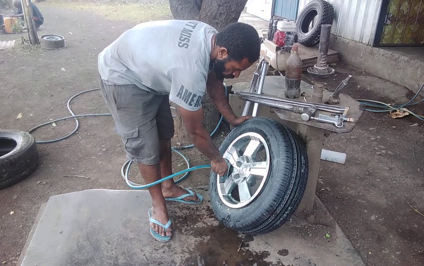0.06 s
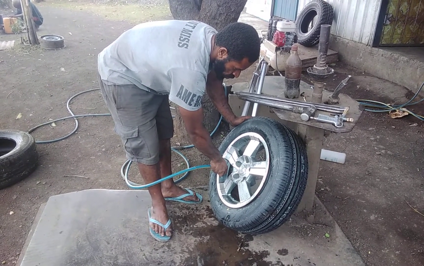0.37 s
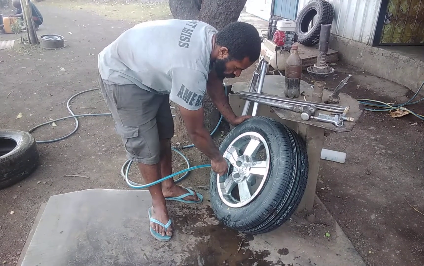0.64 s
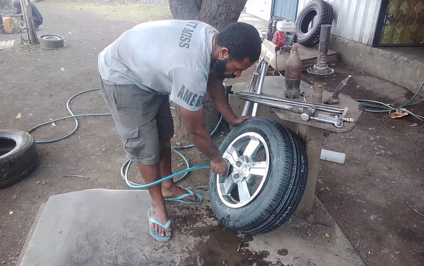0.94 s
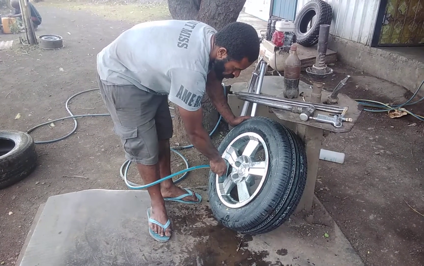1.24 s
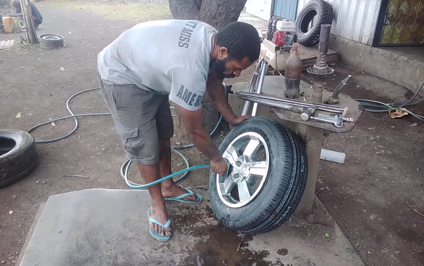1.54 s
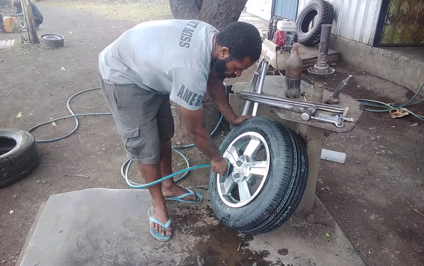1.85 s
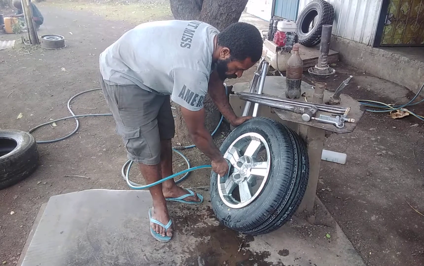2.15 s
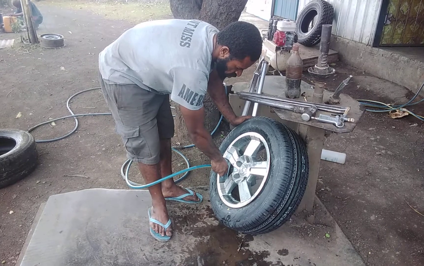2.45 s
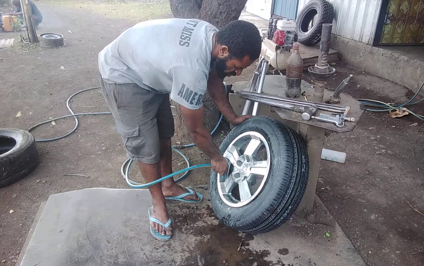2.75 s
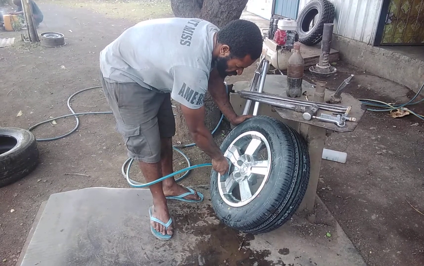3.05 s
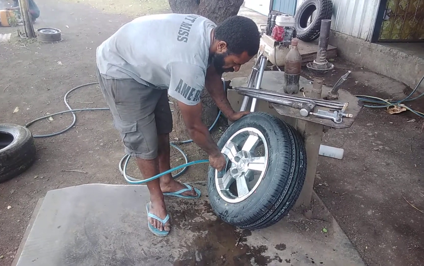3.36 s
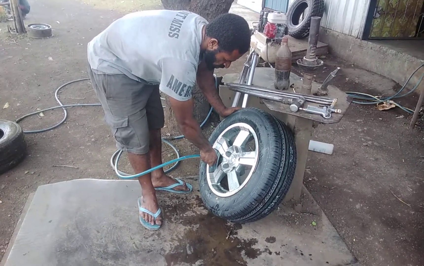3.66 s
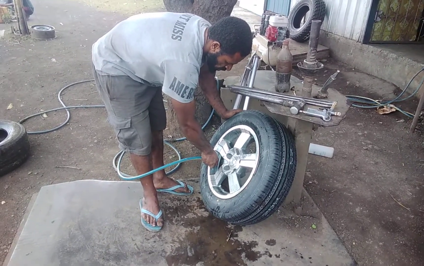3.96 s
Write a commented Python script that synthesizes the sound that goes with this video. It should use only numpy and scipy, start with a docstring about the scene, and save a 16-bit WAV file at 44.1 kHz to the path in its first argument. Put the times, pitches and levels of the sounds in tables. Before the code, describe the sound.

A car tyre being inflated pops onto its rim with one loud bang, after steady valve hiss over a chugging engine and knocking compressor. The close bang overloads the microphone, and the wheel rings briefly in the open yard.

```python
"""A small petrol engine chugs in an open yard, a piston compressor knocks at a slightly different rate,
and air hisses through the valve of a car tyre being inflated on its rim. About three seconds in, the
bead snaps onto the rim, close enough for the bang to overload the single microphone. The air cavity
and the rim ring on, and a few low buffets follow."""
import sys
import numpy as np
from scipy import signal
from scipy.fft import rfft, irfft, next_fast_len
from scipy.io import wavfile

SR = 44100
rng = np.random.default_rng(int(sys.argv[2]) if len(sys.argv) > 2 else 0)


def transcribe(signal):
    """Save signal, clipped to [-1, 1], as a 16-bit WAV file at the path in sys.argv[1]."""
    frames = np.atleast_2d(signal).T
    limited = np.clip(frames, -1, 1)
    pcm = np.round(limited * 32767).astype(np.int16)
    wavfile.write(sys.argv[1], SR, pcm)


N = 176400
TIME = np.arange(N) / SR


def from_db(db):
    """Decibels to gain."""
    return 10 ** (np.asarray(db) / 20)


def rms_one(x):
    """Scale to rms 1."""
    return x / np.sqrt(np.mean(x ** 2) + 1e-20)


def colour(x, points):
    """Causal (minimum-phase) filter with the given (Hz, dB) response."""
    size = next_fast_len(2 * N, real=True) // 2 * 2
    hz, db = np.transpose(points)
    log_hz = np.log(np.fft.rfftfreq(size, 1 / SR) + 1e-9)
    log_gain = np.log(from_db(np.interp(log_hz, np.log(hz), db)))
    cepstrum = irfft(log_gain)
    cepstrum[1:size // 2] *= 2
    cepstrum[size // 2 + 1:] = 0
    return irfft(rfft(x, size) * np.exp(rfft(cepstrum)))[:N]


def noise(points):
    """Coloured noise, rms 1."""
    return rms_one(colour(rng.standard_normal(N), points))


def drift(hz):
    """Random movement, mostly slower than hz, rms 1."""
    rolloff = 1 + (np.fft.rfftfreq(N, 1 / SR) / hz) ** 2
    return rms_one(irfft(rfft(rng.standard_normal(N)) / rolloff, N))


def ring(x, modes):
    """Damped modes driven by x, signs alternating."""
    out = 0
    for k, (hz, db, t60) in enumerate(modes):
        radius, angle = from_db(-60 / (t60 * SR)), 2 * np.pi * hz / SR
        feedback = [1, -2 * radius * np.cos(angle), radius ** 2]
        mode = signal.lfilter([0, np.sin(angle)], feedback, x + 1e-18)
        out = out + (-1) ** k * from_db(db) * mode
    return out


def dying(age, t60):
    """Full level until age 0, then a fall of 60 dB every t60 seconds."""
    return from_db(-60 * np.maximum(age, 0) / t60)


def strokes(hz, first_s, uneven_db, jitter_s):
    """One click per machine cycle, slightly uneven in time and strength."""
    due_s = np.arange(first_s, N / SR, 1 / hz)
    timing, strength = rng.standard_normal((len(due_s), 2)).T
    samples = ((due_s + jitter_s * timing) * SR).astype(int)
    clicks = np.zeros(N)
    clicks[np.clip(samples, 0, N - 1)] = from_db(uneven_db * strength)
    return clicks


ENGINE_HZ = 25.402
# The exhaust puff, heard through the silencer. Each row: frequency in Hz, relative level in dB.
EXHAUST_SPECTRUM = [(12, -22), (25, -12.5), (51, -3), (76, -8.5), (102, -8), (127, -0.5), (152, 0),
                    (178, -13.5), (203, -18), (250, -11.5), (285, -30.5), (345, -26.5), (430, -33),
                    (600, -26.5), (1000, -45), (3000, -65)]
# The intake gulp, heard through the air filter. Each row: frequency in Hz, relative level in dB.
INTAKE_SPECTRUM = [(20, -53), (76, 11), (110, -5), (200, -6.5), (250, 3), (285, -14.5), (345, 4), (400, -4),
                   (430, -22), (482, 2), (540, -22.5), (1500, -45)]


def engine(first_s=-.0046, intake_delay_s=.0275):
    """In each cycle an exhaust puff rings in the silencer and a weaker intake gulp follows."""
    puffs = strokes(ENGINE_HZ, first_s, uneven_db=.53, jitter_s=.0001)
    gulps = strokes(ENGINE_HZ, first_s + intake_delay_s, uneven_db=.53, jitter_s=.0001)
    exhaust = from_db(-26.5) * rms_one(colour(puffs - puffs.mean(), EXHAUST_SPECTRUM))
    intake = from_db(-41) * rms_one(colour(gulps, INTAKE_SPECTRUM))
    return intake - exhaust


# The compressor's body. Each row: frequency in Hz, relative level in dB, seconds to fall 60 dB.
BODY_MODES = [(578.5, -5.5, 0.064), (705, -7, 0.05), (795, -5, 0.081), (863.6, -1, 0.1), (963, -5, 0.032),
              (1281, -11.5, 0.11)]
# Its drone. Each row: multiple of the stroke rate, peak level in dB about which the tone wavers.
DRONE_TONES = [(8, -42), (11.5, -46), (13, -53), (21, -48), (25, -48.5)]
# Both machines clattering in the yard. Each row: frequency in Hz, relative noise density in dB.
CLATTER_SPECTRUM = [(20, -3), (130, 0.5), (220, -6), (330, 3), (390, -1.5), (440, -7.5), (535, -9.5),
                    (590, -4), (670, -0.5), (880, 1), (990, -1), (1060, -8), (1160, -8), (1280, 0.5),
                    (1400, -1.5), (1620, -6.5), (1800, -5), (2100, -6), (2400, -12), (2750, -8),
                    (3200, -15), (8000, -28.5)]


def compressor(stroke_hz=28.557, rattle_decay_s=.0037):
    """Each piston stroke knocks and briefly rattles the body, over a drone and a steady clatter."""
    knocks = strokes(stroke_hz, first_s=.0225, uneven_db=1.0, jitter_s=.00015)
    rattle_envelope = signal.lfilter([1], [1, -np.exp(-1 / (rattle_decay_s * SR))], knocks)
    rattle = rattle_envelope * rng.standard_normal(N)
    body = rms_one(ring(rms_one(knocks) + .29 * rms_one(rattle), BODY_MODES))
    drone = 0
    for multiple, db in DRONE_TONES:
        level = from_db(db + 3.5 * drift(hz=2.7))
        drone = drone + level * np.sin(2 * np.pi * (multiple * stroke_hz * TIME + rng.random()))
    clatter = from_db(-33 + .83 * drift(hz=12)) * noise(CLATTER_SPECTRUM)
    return from_db(-37.5) * body + drone + clatter


# Air rushing in at the tyre valve. Each row: frequency in Hz, relative noise density in dB.
HISS_SPECTRUM = [(1000, -16), (3000, -13.5), (3800, -9.5), (4300, -8.5), (4600, -3.5), (4850, -6),
                 (5300, -.5), (5800, -2.5), (6700, -0.5), (7400, -2), (7800, -2), (8300, -3), (10300, -6),
                 (11800, -4.5), (13200, -10), (14200, -8.5), (15700, -23.5)]


def valve_air(whistle_hz=15060, whistle_width_hz=130):
    """The jet in the valve hisses, throbs slightly with the engine and carries a thin whistle."""
    throb = 1 + .069 * np.cos(2 * np.pi * ENGINE_HZ * TIME)
    hiss = from_db(-32 + 1.05 * drift(hz=25)) * throb * noise(HISS_SPECTRUM)
    whistle = rms_one(drift(whistle_width_hz / 2) * np.sin(2 * np.pi * whistle_hz * TIME))
    return hiss + from_db(-56) * whistle


# The bead slipping over the rim's hump. Each row: frequency in Hz, relative noise density in dB.
CRACK_SPECTRUM = [(200, -8), (900, 7), (1800, -3.5), (2300, -11), (2800, 4), (4200, -6.5), (8000, -10),
                  (16000, -10)]
# The bead hitting the rim. Each row: frequency in Hz, relative noise density in dB.
BLAST_SPECTRUM = [(30, -9), (70, -5), (110, -17), (165, 5.5), (205, -7), (300, -1.5), (400, 1), (490, 2),
                  (640, 2), (790, -6.5), (1030, 0.5), (1250, -12.5), (1600, -6), (2300, -17), (2700, -13),
                  (4000, -21.5), (7000, -16.5), (12000, -21), (16000, -37)]
# The echo off the yard's walls and ground. Each row: frequency in Hz, relative noise density in dB.
ECHO_SPECTRUM = [(30, 0.5), (120, 4), (205, -5.5), (310, 4), (400, -0.5), (480, -8.5), (650, 1), (780, -8),
                 (1030, -0.5), (1250, -4), (2000, -9), (2400, -11), (3500, -18.5), (7000, -12),
                 (12000, -16), (16000, -18.5)]
# The wheel ringing, air cavity first. Each row: frequency in Hz, level in dB, seconds to fall 60 dB.
WHEEL_MODES = [(236.5, -17, 1.55), (303, -7, 0.18), (352, -23, 0.33), (409.6, -13, 0.26), (514, -18, 0.33),
               (607, -15, 0.3), (664, -21, 0.2), (697, -19, 0.77), (956, -16.5, 0.24), (975, -31, 0.22),
               (1400, -46, 0.16), (1583, -23, 0.29), (1745, -36, .2), (1960, -26, 0.37)]


def bead_pop(start_s=2.9692, thump_s=.0033, crack_delay_s=.00196, attack_s=.00039, hold_s=.0085):
    """The bead seats with a pressure pulse, a crack, a short blast and its echo; the wheel rings on."""
    age = TIME - start_s
    thump = -from_db(2) * np.sin(np.pi * np.clip(age / thump_s, 0, 1)) ** 2
    attack = np.clip((age - crack_delay_s) / attack_s, 0, 1)
    crack = from_db(2) * dying(age - crack_delay_s, t60=.021) * noise(CRACK_SPECTRUM)
    blast = from_db(2.5) * dying(age - hold_s, t60=.095) * noise(BLAST_SPECTRUM)
    echo = from_db(-6.5) * dying(age - hold_s, t60=.24) * noise(ECHO_SPECTRUM)
    blow = np.zeros(N)
    blow[int((start_s + crack_delay_s) * SR)] = 1
    return thump + attack * (crack + blast + echo) + ring(blow, WHEEL_MODES)


# Low buffets at the microphone. Each row: centre in seconds, length in seconds, peak level in dB.
BUFFET_EVENTS = [(3.027, 0.078, -19), (3.164, 0.089, -21), (3.244, 0.04, -16), (3.29, .05, -20),
                 (3.378, .05, -27)]


def buffets():
    """Soft low bumps after the bang, each a few cycles long at most."""
    out = 0
    for centre_s, length_s, db in BUFFET_EVENTS:
        offset_s = TIME - centre_s
        swell = np.cos(np.pi * np.clip(offset_s / length_s, -.5, .5))
        hz = rng.uniform(26.7, 51)
        out = out + from_db(db) * swell * np.cos(2 * np.pi * hz * offset_s)
    return out


def scene():
    """The whole yard reaches one microphone, the same in both channels."""
    mono = engine() + compressor() + valve_air() + bead_pop() + buffets()
    return np.array([mono, mono])


def record(dry):
    """The microphone clips hard on the bang, and the highest treble is cut."""
    overload, cutoff_hz = .68, 15800
    clipped = np.clip(dry, -overload, overload)
    lowpass = signal.ellip(10, .05, 60, cutoff_hz, fs=SR, output="sos")
    return signal.sosfiltfilt(lowpass, clipped)


dry = scene()
out = record(dry)
transcribe(out)
```